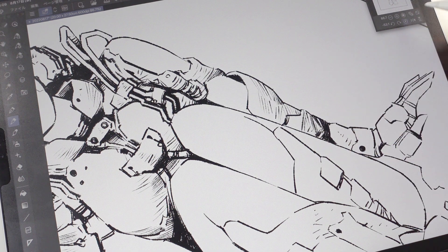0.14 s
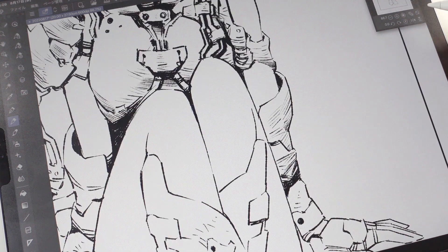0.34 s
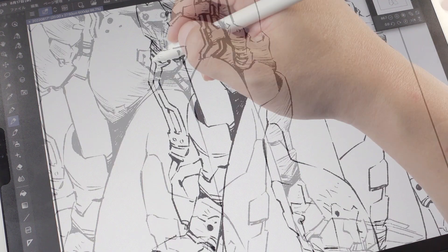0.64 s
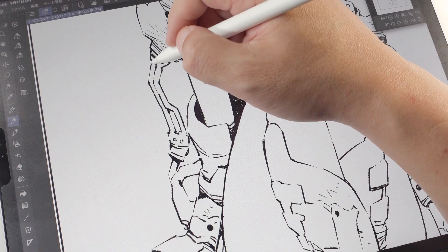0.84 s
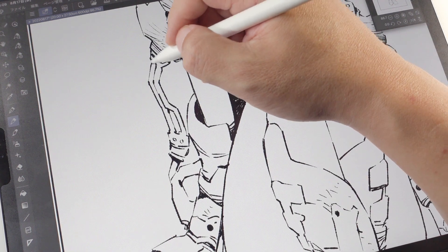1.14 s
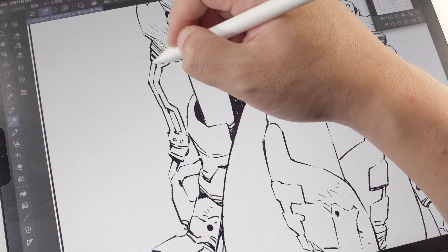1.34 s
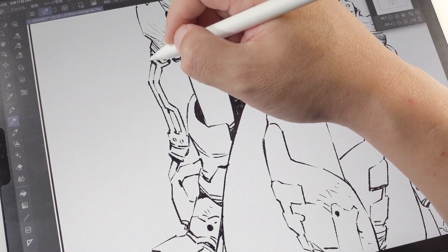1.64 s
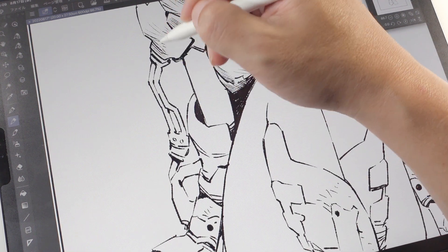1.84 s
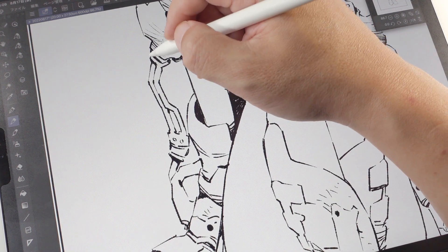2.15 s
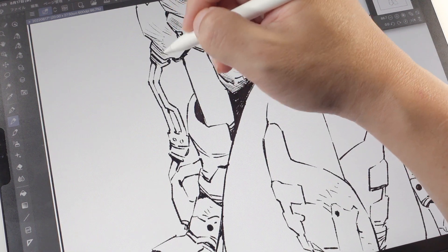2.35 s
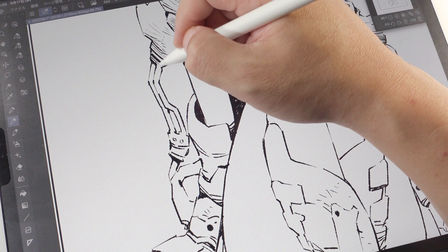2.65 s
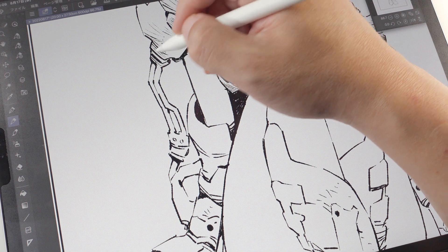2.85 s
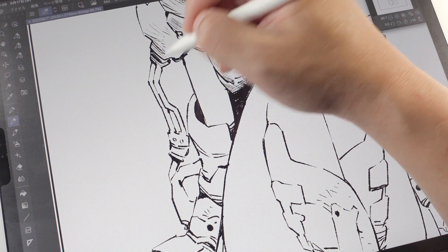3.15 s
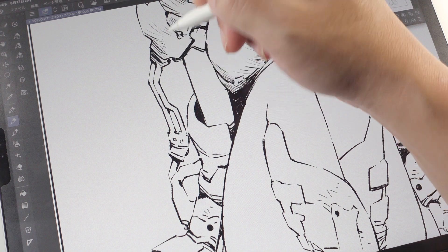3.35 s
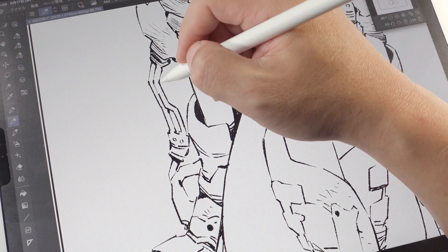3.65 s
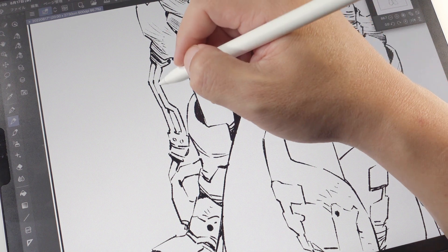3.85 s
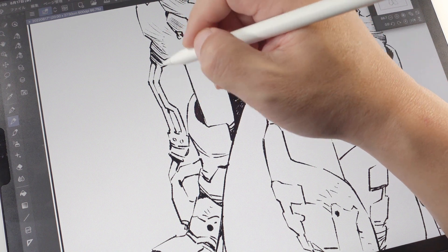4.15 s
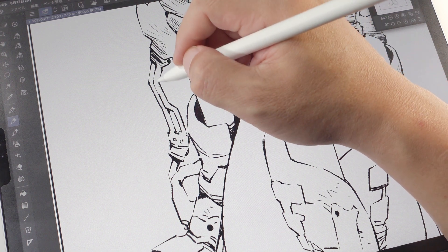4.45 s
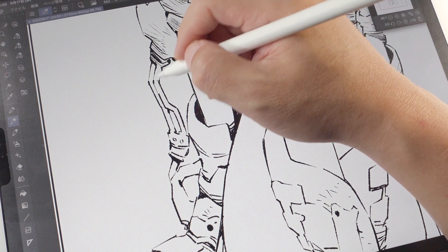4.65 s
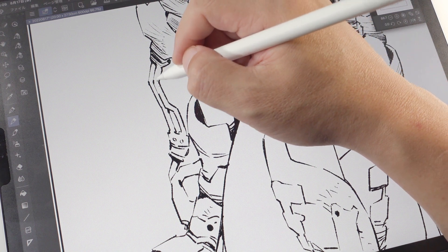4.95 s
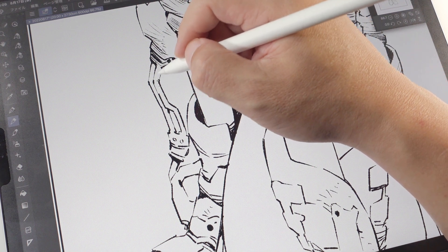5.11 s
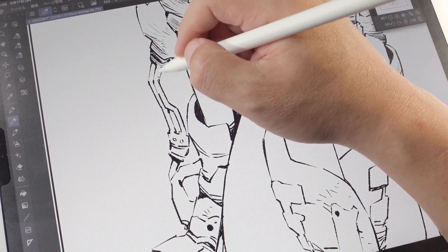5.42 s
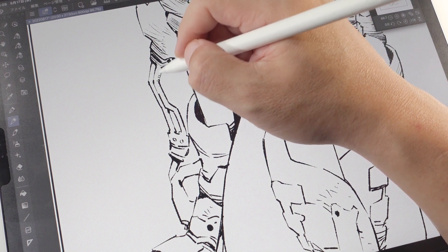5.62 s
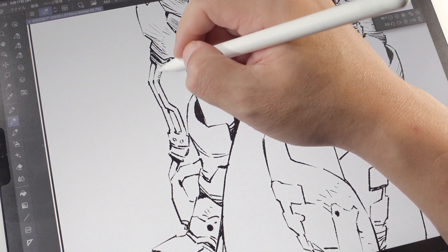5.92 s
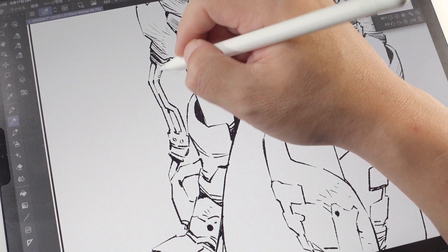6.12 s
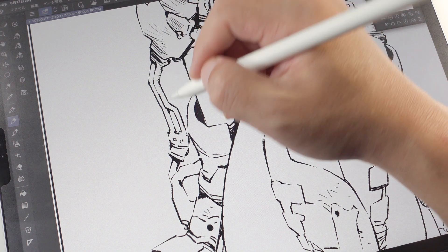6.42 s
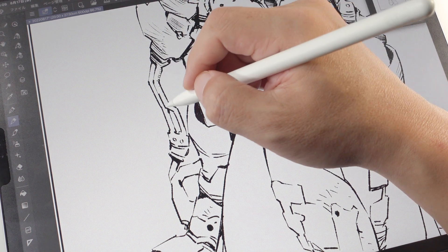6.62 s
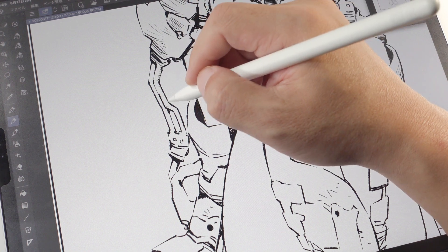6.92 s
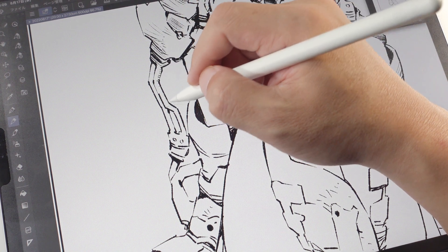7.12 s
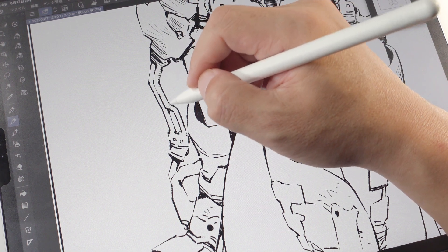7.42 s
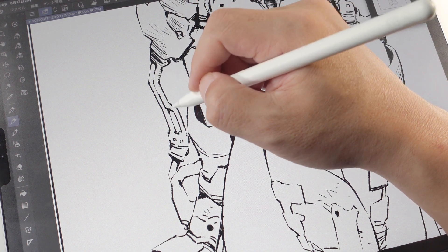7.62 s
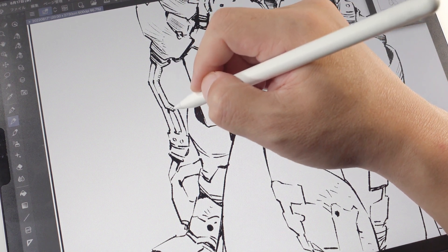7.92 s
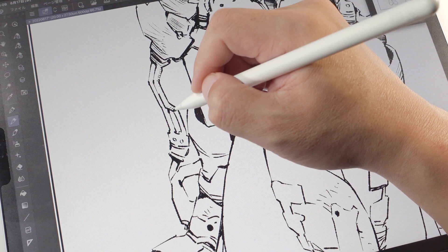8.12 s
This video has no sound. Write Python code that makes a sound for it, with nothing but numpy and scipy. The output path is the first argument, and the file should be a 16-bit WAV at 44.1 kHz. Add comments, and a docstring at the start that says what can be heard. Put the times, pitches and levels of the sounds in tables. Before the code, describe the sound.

A hard stylus tip taps a glass drawing tablet on a desk, each tap a tight click with a dull case knock and low desk thump. Quick scratchy strokes cluster early, then sharper hissing ones, then spaced taps with tiny scrapes. A palm lands softly twice. Small indoor room, low hum and faint hiss, close stereo microphones.

```python
"""Desk tremor, a low room hum and microphone hiss run throughout, made of shaped noise.
At once a plastic stylus begins to tap a glass tablet, on a desk that also holds a camera close by.
Each tap is a set of fading tones: a click in the glass, a knock in the case and a sway of the desk.
Strokes follow the taps as friction noise; at times skin swishes over the glass, also as noise.
From the middle on, the palm lands softly now and then: a slow rocking of the desk and a dull rub."""
import sys
import numpy as np
from scipy import signal
from scipy.fft import rfft, irfft, next_fast_len
from scipy.io import wavfile
from scipy.ndimage import map_coordinates

SR = 44100
rng = np.random.default_rng(int(sys.argv[2]) if len(sys.argv) > 2 else 0)


def materialize(psi):
    """Save the field psi as 16-bit PCM at rate SR to the path in sys.argv[1].

    A 1-D psi becomes a single channel; in a 2-D psi each row is a channel.
    """
    bounded = np.clip(np.atleast_2d(psi).T, -1, 1)
    quanta = np.round(bounded * 32767).astype(np.int16)
    wavfile.write(sys.argv[1], SR, quanta)


N = 364707  # length in samples


def amp(db):
    """Turn a level in dB into a factor for the sound wave."""
    return 10 ** (np.asarray(db) / 20)


def unit(x):
    """Scale x to an average strength (rms) of 1."""
    return x / np.sqrt(np.mean(x ** 2) + 1e-20)


def along(points, hz):
    """Read a value between (Hz, value) points, with pitch on a log axis."""
    point_hz, values = np.transpose(points)
    return np.interp(np.log(hz + 1), np.log(point_hz + 1), values)


def curves(rows):
    """Give one value per sample for each column after the time."""
    seconds, *columns = np.transpose(rows)
    return [np.interp(np.arange(N) / SR, seconds, column) for column in columns]


def wobble(rate):
    """Draw a smooth random curve through rate random points a second."""
    knots = rng.standard_normal(int(N * rate / SR) + 4)
    return map_coordinates(knots, [np.arange(N) * rate / SR])


def filtered(x, response):
    """Multiply each frequency of x by the response at that frequency."""
    m = next_fast_len(N + SR // 2)
    spectrum = rfft(x, m) * response(np.fft.rfftfreq(m, 1 / SR))
    return irfft(spectrum, m)[..., :N]


def shape(points):
    """Make a gain for each frequency from (Hz, dB) points."""
    return lambda hz: amp(along(points, hz))


def noise(gain, alike):
    """Make stereo noise of rms 1: sharing the middle and side parts sets how alike left and right are."""
    def turn(hz):
        return np.arccos(np.clip(along(alike, hz), -1, 1)) / 2

    def middle_and_side(hz):
        return gain(hz) * [np.cos(turn(hz)), np.sin(turn(hz))]

    mid, side = filtered(rng.standard_normal((2, N)), middle_and_side)
    return unit(np.array([mid + side, mid - side]))


def swept(x, centre_hz, width_hz, skirt):
    """Pass x through a moving resonance at unchanged power; skirt is the gain left far from its peak."""
    hz, t, z = signal.stft(x, SR, nperseg=256)
    at = np.minimum((t * SR).astype(int), N - 1)
    peak = skirt + np.exp(-((hz[:, None] - centre_hz[at]) / (width_hz[at] + 1)) ** 2)
    power = np.mean(abs(z) ** 2, axis=(0, 2))
    peak = peak / np.sqrt(power @ peak ** 2 / power.sum())
    return signal.istft(z * peak, SR, nperseg=256)[1][:, :N]


def swells(start, held, rise, fall):
    """Make one row of gains per movement: a rise in dB per s up to start, a hold in s, a fall in dB per s."""
    t = np.arange(N // 44 + 2) * 44 / SR - np.reshape(start, (-1, 1))  # steps of about 1 ms
    rising = np.reshape(rise, (-1, 1)) * np.minimum(t, 0)
    falling = fall * np.maximum(t - np.abs(np.reshape(held, (-1, 1))), 0)
    return amp(rising - falling)


def summed(db, gains):
    """Add the power of all movements at their levels and give one gain per sample."""
    total = np.sqrt(amp(db) ** 2 @ gains ** 2)
    return np.interp(np.arange(N) / 44, np.arange(gains.shape[1]), total)


def leading(values, db, gains):
    """Average the movements' values by power, so the loudest movement leads."""
    weight = (amp(db)[:, None] * gains) ** 2 + 1e-30
    mean = values @ weight / weight.sum(axis=0)
    return np.interp(np.arange(N) / 44, np.arange(gains.shape[1]), mean)


# The desk trembles under the arm. Each row: time in seconds, level in dB before a random wobble.
TREMOR_LEVEL = [(0.0, -35.5), (0.55, -38.5), (1.15, -23.5), (2.97, -33.5), (3.78, -21), (4.05, -30),
                (4.47, -26), (5.27, -35.5), (5.44, -32.5), (6.06, -22.5), (6.4, -32), (6.7, -15.5),
                (6.82, -29.5), (7.6, -29.5), (7.76, -24), (8.27, -22.5)]
# Tone colour of the tremor. Each row: frequency in Hz, relative level in dB per Hz.
TREMOR_COLOUR = [(2, 2), (8, 15), (15, 8.5), (25, 14), (35, -15), (60, -8), (120, -120)]


def desk_tremor():
    """The desk trembles: very low noise whose level wanders."""
    level = amp(curves(TREMOR_LEVEL)[0] + 3.0 * wobble(6))
    return level * noise(shape(TREMOR_COLOUR), [(25, 0.077)])


# The steady background. Each row: time in seconds, hum level in dB before a wobble, hiss level in dB.
BACKGROUND_LEVEL = [(0, -43, -64), (.45, -49.5, -67), (.92, -41.5, -61.5), (4.4, -41.5, -62),
                    (8.27, -40.5, -61)]
# Tone colours of the hum and the hiss. Each row: frequency in Hz, relative level in dB per Hz.
HUM_COLOUR = [(24, -13), (40, -9), (75, -10.5), (205, -16.5), (281, -21), (363, -33.5), (772, -42.5),
              (969, -56.5), (1200, -50), (1560, -103), (2640, -120)]
HISS_COLOUR = [(530, -46), (900, -2), (1030, -9), (1370, -3), (1580, -7), (2900, -3), (4610, -2.5),
               (9200, -7.5), (12400, -8), (15600, -11.5)]
# How alike the two sides are. Each row: frequency in Hz, likeness (1 is the same, 0 is unrelated).
BACKGROUND_ALIKE = [(60, 0.04), (180, 0.81), (550, 0.34), (1650, 0.32), (4970, 0.028), (15000, 0.051)]


def hum_and_hiss():
    """The room hums as slightly wavering low noise; the microphones hiss as steadier, brighter noise."""
    hum_db, hiss_db = curves(BACKGROUND_LEVEL)
    hum = amp(hum_db + 0.7 * wobble(8.3)) * noise(shape(HUM_COLOUR), BACKGROUND_ALIKE)
    hiss = amp(hiss_db) * noise(shape(HISS_COLOUR), BACKGROUND_ALIKE)
    return hum + hiss


def ring(modes, t, blow, attack, crest, spread=0):
    """A struck body rings in fading tones that crest together, low ones later by spread (s at 70 Hz)."""
    t = np.maximum(t, 0)
    # blow: (Hz, dB) points of how hard each tone is struck; each tone also varies a little by chance
    chance = rng.normal(0, [2.2, .015, .35], (len(modes), 3))
    tones = 0
    for (hz, db, t60), (more_db, detune, phase) in zip(modes, chance):
        fading = amp(db + along(blow, hz) + more_db - 60 * t / t60)
        since_crest = t - crest - spread * np.sqrt(70 / hz)
        tones = tones + fading * np.cos(2 * np.pi * hz * (1 + detune) * since_crest + phase)
    return tones * (1 - np.exp(-t / attack)) ** 3


# The taps. Each row: time in seconds, then relative levels in dB: click low, click high, click snap,
# knock low, knock middle, knock high, desk sway.
TAP_LIST = [(0.0094, -24, -24.5, -40.5, -22, -28, -41, -7.5), (0.7828, -27.5, -47, -62, -23, -20, -47, -12),
            (1.1295, -25.5, -44, -59, -23.5, -26, -47, -19), (2.1674, -38, -66, -63, -32, -29, -74, -19),
            (2.655, -15.5, -31, -39.5, -13, -21, -34.5, 0.5),
            (3.022, -53, -61, -69, -38.5, -36.5, -83, -18), (4.007, -30, -49, -61, -22.5, -26, -35.5, -9),
            (4.5453, -34.5, -72, -67, -35.5, -32.5, -45.5, -16.5),
            (4.923, -45, -79, -71, -40.5, -43.5, -57.5, -18.5),
            (5.2575, -30, -70, -58, -24, -24.5, -41, -10), (5.5152, -28, -63, -61, -20, -25.5, -39, -7.5),
            (5.7347, -27.5, -51, -58, -22.5, -24, -42.5, -8),
            (5.929, -22.5, -34.5, -54.5, -15.5, -22, -36.5, -7),
            (6.0951, -26, -37.5, -60, -16, -24, -36, -3), (6.8015, -38, -51, -70, -27, -32, -47, -20),
            (7.0324, -24.5, -24.5, -53, -19, -22.5, -35, -5), (7.2912, -27.5, -30, -80, -25, -24, -40, -15),
            (7.5616, -28.5, -27.5, -68, -27, -26, -39, -9.5),
            (7.8047, -24, -21, -47, -15.5, -19, -32, -3.5), (8.016, -23.5, -25, -57, -21, -19.5, -36, -5),
            (8.2273, -30.5, -30, -68, -19, -25, -39, -9.5)]
# Tones of the glass, the case and the desk, before chance changes to level and pitch.
# Each row: frequency in Hz, relative level in dB, time to fade by 60 dB in seconds.
GLASS_TONES = [(2084, -13, 0.02), (2256, 5, 0.01), (2750, 1.5, 0.0081), (3054, -5.5, 0.011),
               (3280, -13, 0.01), (3720, -4.5, 0.019), (3900, -24, 0.005), (4550, 7.5, 0.0075),
               (5300, 4, 0.0049), (7800, 21.5, 0.0022), (10600, 4.5, 0.0053)]
CASE_TONES = [(68.6, 3.5, 0.05), (115, -6.5, 0.09), (156.2, -3.5, 0.071), (189.6, -1.5, 0.0559),
              (256.5, -9.5, 0.057), (349, -1, 0.036), (448.7, 0, 0.05), (527, -1.5, 0.028),
              (620, -21, 0.043), (872, 3, 0.016), (1055, -4, 0.014), (1396, -10.5, 0.016)]
DESK_TONES = [(24.7, -8.5, 0.32), (13.6, -25, 0.88)]


def taps():
    """The glass clicks through the air; knock and sway follow through desk and stand."""
    click, knock = np.zeros(N + SR), np.zeros(N + SR)
    t = np.arange(SR // 2) / SR - 1 / 500  # s, from 2 ms before the tap
    for s, tock_db, tick_db, snap_db, low_db, mid_db, high_db, sway_db in TAP_LIST:
        first = round((s + t[0]) * SR)
        at = slice(first, first + len(t))
        glass_blow = [(2300, tock_db + 7.5), (2600, tick_db + 18.5),
                      (3300, tick_db + 4.0), (3550, snap_db + 11.5)]
        click[at][:2000] -= ring(GLASS_TONES, t[:2000] + 0.000427, glass_blow,
                                 attack=0.00084, crest=0.001497)
        # the panel dents for an instant
        knock[at] -= amp(low_db + 5.0) * np.exp(-((t - .0011) / 0.00065) ** 2)
        case_blow = [(270, low_db + 12.5), (340, mid_db + 7.5), (660, mid_db + 6), (800, high_db + 21.5)]
        knock[at] -= ring(CASE_TONES, t - .0005, case_blow, attack=0.0025, crest=0.002315, spread=0.0019)
        knock[at] += ring(DESK_TONES, t - .004, [(25, sway_db + 6.5)], attack=0.0082, crest=0.013)
    return click[:N], knock[:N]


SKID_DELAY = 0.0087  # s from a tap to its skid and shudder

# Tone colour of the shuddering case. Each row: frequency in Hz, relative level in dB per Hz.
SHUDDER_COLOUR = [(60, -120), (110, -0.5), (300, -4), (600, -12), (900, -19), (1150, -28), (2000, -120)]


def case_shudder():
    """The case shudders on after a tap: noise 15.5 dB under the middle knock level, falling 236 dB per s."""
    tap_s, mid_db = np.transpose(TAP_LIST)[[0, 5]]
    gain = summed(mid_db - 15.5, swells(tap_s + SKID_DELAY, 0, 4000, 236))
    return gain * noise(shape(SHUDDER_COLOUR), [(400, 0.93)])


RUB_ALIKE = [(1000, 0.98), (10000, 0.47)]  # left-right likeness of all rubbing: (Hz, likeness)

# The strokes. Each row: start of full speed in seconds, hold in seconds, rise in dB per s,
# scrape level in dB, scrape centre in Hz, scrape width in Hz, rasp level in dB, squeak level in dB,
# tip hiss level in dB, tip hiss centre in Hz. The levels are relative.
STROKE_LIST = [(0.027, 0.015, 893, -50.5, 3480, 800, -66, -80, -84, 8000),
               (0.908, 0.017, 800, -55, 1950, 500, -57.5, -81, -69, 8600),
               (1.195, 0.021, 800, -46.5, 2230, 700, -70, -70, -64, 8650),
               (1.262, 0.047, 1800, -45, 2430, 700, -52.5, -74, -56, 8150),
               (1.365, 0.018, 900, -47.5, 2600, 600, -64, -73, -58, 9190),
               (1.451, 0.036, 1800, -51, 2640, 380, -53.5, -82, -70, 8240),
               (1.547, 0.024, 1000, -52, 2600, 300, -58, -68, -59, 8300),
               (1.618, 0.038, 1400, -53, 2700, 350, -58, -71, -63.5, 8190),
               (1.712, 0.024, 1000, -50.5, 2880, 500, -70, -70, -59, 7300),
               (2.227, 0.036, 1200, -47.5, 2360, 594, -86, -54, -38.5, 7860),
               (2.7, 0.015, 550, -44.5, 2430, 600, -53.5, -42.5, -42.5, 9500),
               (3.09, 0.025, 1000, -40.5, 2600, 644, -67, -47, -31.5, 8340),
               (3.236, 0.0036, 1500, -76, 2700, 600, -75, -66, -68, 9400),
               (4.055, .006, 500, -52, 2360, 500, -50, -80, -67, 8530),
               (4.6, .006, 500, -63, 2170, 500, -73, -80, -75, 8000),
               (5.312, .006, 500, -63, 2120, 500, -67, -82, -73, 7800),
               (5.555, 0.019, 500, -67, 2260, 500, -67, -82, -80, 8600),
               (5.78, .01, 500, -65, 2320, 500, -68, -82, -77, 8200),
               (5.98, .006, 400, -64, 2440, 500, -67, -82, -74, 8600),
               (6.148, .006, 500, -57.5, 2360, 500, -59.5, -89, -76, 8000),
               (6.874, .006, 500, -61, 2620, 348, -66, -82, -75, 8260),
               (7.078, 0.011, 400, -58.5, 2530, 600, -69, -74, -74, 8500),
               (7.364, 0.014, 400, -53.5, 2570, 300, -63, -78, -74, 8750),
               (7.625, 0.016, 300, -58, 2620, 352, -62, -84, -76, 9100),
               (7.862, 0.014, 349, -52, 2680, 300, -62, -84, -69, 8560),
               (8.075, 0.021, 350, -52, 2680, 300, -65, -74, -73, 8700)]


def strokes():
    """The rubbing tip makes friction noise in glass and case; it also skids briefly after each tap."""
    (s, held, rise, scrape_db, scrape_hz, width_hz,
     rasp_db, squeak_db, tip_db, tip_hz) = np.transpose(STROKE_LIST)
    # a faint drag, falling at only 160 dB per s, outlasts the stroke
    speed = swells(s, held, rise, 790) + amp(-17.5) * swells(s, held, rise, 160)
    skid = swells(np.transpose(TAP_LIST)[0] + SKID_DELAY, 0, 4000, 520)
    grit = unit(amp(1.5 * wobble(180)))  # the tip catches unevenly
    rubbing = (scrape(speed, skid, scrape_db, scrape_hz, width_hz) + rasp(speed, skid, rasp_db)
               + squeak(speed, squeak_db) + tip_hiss(speed, tip_db, tip_hz))
    return grit * rubbing


# Tone colour of rubbed glass. Each row: frequency in Hz, relative level in dB per Hz.
SCRAPE_COLOUR = [(1400, -120), (1650, -16.5), (1850, 0.5), (2050, 2), (2250, 2), (2430, -5), (2680, 2.5),
                 (3000, -2.5), (3400, -14), (3800, -11), (4500, -5), (5000, -120)]
# Two scrapes of a skid, following the low and the high click.
# Each row: centre in Hz, level in dB relative to that click.
SKID_SCRAPES = [(2250, -27), (2950, -24.5)]


def scrape(speed, skid, scrape_db, centre_hz, width_hz):
    """Friction sounds the glass: noise through a resonance that moves with strokes and skids."""
    tock_db, tick_db = np.transpose(TAP_LIST)[[1, 2]]
    (low_hz, low_db), (high_hz, high_db) = SKID_SCRAPES
    each = np.ones(len(TAP_LIST))
    rubs = np.r_[speed, skid, skid]
    level_db = np.r_[scrape_db, tock_db + low_db, tick_db + high_db]
    centre_hz = leading(np.r_[centre_hz, low_hz * each, high_hz * each], level_db, rubs)
    width_hz = leading(np.r_[width_hz, 840 * each, 840 * each], level_db, rubs)
    glass = noise(shape(SCRAPE_COLOUR), RUB_ALIKE)
    return summed(level_db, rubs) * swept(glass, centre_hz, width_hz, skirt=0.08)


# The rasp moves with the place on the screen. Each row: time in seconds, centre in Hz, width in Hz.
RASP_PLACE = [(0, 1720, 280), (2.3, 1800, 279), (2.6, 1450, 400), (6.2, 1350, 300), (6.7, 1360, 180)]


def rasp(speed, skid, rasp_db):
    """Friction excites the case's top modes; after taps the rasp follows the high knock, 20 dB lower."""
    def top_modes(hz):
        return 1 / (1 + ((hz - 1360) / 70) ** 2) + 0.54 / (1 + ((hz - 1740) / 170) ** 4)

    high_db = np.transpose(TAP_LIST)[6]
    gain = summed(np.r_[rasp_db, high_db - 20], np.r_[speed, skid])
    return gain * swept(noise(top_modes, RUB_ALIKE), *curves(RASP_PLACE), skirt=.1)


def squeak(speed, squeak_db):
    """Strokes squeak: noise in one narrow resonance near 5230 Hz."""
    return summed(squeak_db, speed) * noise(lambda hz: 1 / (1 + ((hz - 5230) / 160) ** 2), RUB_ALIKE)


# Resonances of the stylus tip. Each row: centre in Hz, width in Hz, relative level in dB.
TIP_TONES = [(6370, 120, -0.5), (6820, 260, -4), (8240, 300, -9.5), (9150, 140, -15), (9490, 400, -1.5),
             (10640, 310, -8), (11400, 230, -8.5), (12700, 300, -12)]
# Tone colour of fast strokes. Each row: frequency in Hz, relative level in dB per Hz.
FAST_COLOUR = [(3100, -40), (3550, -27), (4000, -37.5), (5800, -33.5), (6070, -42), (6300, -23.5),
               (6560, -17.5), (8410, -19), (10700, -12.5), (12900, -15), (14900, -29), (15600, -54)]


def tip_hiss(speed, tip_db, tip_hz):
    """Light strokes only ring the tip's resonances; hard ones hiss broadly."""
    def resonances(hz):
        return sum(amp(db) / (1 + ((hz - centre) / width) ** 2) ** 2 for centre, width, db in TIP_TONES)

    gain = summed(tip_db, speed ** 0.98) * unit(amp(2.5 * wobble(70)))
    hard = 1 / (1 + amp(-47 - leading(tip_db, tip_db, speed)) ** 2)  # share of broad hiss, half at -47 dB
    ringing = np.sqrt(1 - hard) * noise(resonances, RUB_ALIKE)
    broad = np.sqrt(hard) * noise(shape(FAST_COLOUR), RUB_ALIKE)
    centre_hz, width_hz = leading(tip_hz, tip_db, speed), np.full(N, 1040)
    return gain * swept(ringing + broad, centre_hz, width_hz, skirt=0.59)


# How the room's answer dies away. Each row: frequency in Hz, time to fade by 60 dB in seconds.
ROOM_FADE = [(200, 0.23), (2000, 0.18), (10000, 0.02)]


def room(x):
    """The room answers with fading noise; four different answers take turns."""
    hz, t, z = signal.stft(rng.standard_normal((4, 2, SR // 2)), SR, nperseg=256)
    fading = amp(-60 * t / along(ROOM_FADE, hz)[:, None])
    tails = signal.istft(z * fading, SR, nperseg=256)[1]
    tails = tails / np.linalg.norm(tails[0, 0])
    turns = (np.arange(N) // (SR // 5) % 4 == np.arange(4)[:, None]) * x  # a new answer every 0.2 s
    late = np.pad(turns, ((0, 0), (300, 0)))  # the answer waits 300 samples
    return signal.fftconvolve(late[:, None], tails, axes=2).sum(axis=0)[:, :N]


# Skin slides on the glass. Each row: time of the peak in seconds, relative level in dB.
SWISH_LIST = [(0.664, -59), (4.146, -60), (6.348, -40.5)]
# Tone colour of sliding skin. Each row: frequency in Hz, relative level in dB per Hz.
SKIN_COLOUR = [(4350, -55), (7400, -23), (7780, -5), (8250, 1.5), (9260, -10.5), (9820, -1), (10400, -16),
               (10700, -1.5), (11300, 4), (11800, -21), (12900, 0), (14300, -8), (15600, -21)]


def skin_swish():
    """Skin slides over the glass: bright noise swelling at 900 and fading at 330 dB per s."""
    s, db = np.transpose(SWISH_LIST)
    return summed(db, swells(s, 0, 900, 330)) * noise(shape(SKIN_COLOUR), [(9000, 0.25)])


# The palm drags. Each row: start of full level in seconds, hold in seconds, level in dB before a wobble.
DRAG_LIST = [(3.575, 0.088, -51), (3.8, 0.011, -55), (6.525, 0.056, -47), (6.712, 0.082, -57)]
# Tone colour of the dragging palm. Each row: frequency in Hz, relative level in dB per Hz.
DRAG_COLOUR = [(80, -120), (200, 3), (350, 0), (550, -4), (760, -0.5), (900, -17.5), (1500, -27),
               (3000, -48), (5000, -120)]


def palm_drag():
    """The palm drags with a dull, uneven rub of low noise."""
    s, held, db = np.transpose(DRAG_LIST)
    gain = summed(db, swells(s, held, 520, 400)) * amp(3.1 * wobble(90))
    return gain * noise(shape(DRAG_COLOUR), [(500, 0.91)])


# The palm lands. Each row: time in seconds, relative sway level in dB, rise in seconds, frequency in Hz.
LANDING_LIST = [(3.621, -8, 0.037, 22.8), (3.81, -19, 0.11, 21.3), (6.53, -2.5, 0.041, 21.7),
                (6.711, -19, 0.011, 21)]


def palm_landing():
    """The landing palm rocks the desk: a slow tone that swells, then fades by 60 dB in 0.25 s."""
    rock = np.zeros(N)
    for s, db, rise, hz in LANDING_LIST:
        t = np.arange(N) / SR - s
        drop_db = np.where(t < 0, 9.6 * (t / rise) ** 2, 60 * t / 0.25)
        rock -= amp(db - drop_db) * np.cos(2 * np.pi * hz * t)
    return rock * amp([[-.7], [.7]])  # left and right, dB


def scene():
    """Add everything that reaches the two microphones."""
    background = desk_tremor() + hum_and_hiss()
    click, knock = taps()
    rubbing = case_shudder() + strokes() + skin_swish()
    palm = palm_drag() + palm_landing()

    above_sway = filtered(knock, lambda hz: hz ** 2 / (hz ** 2 + 90 ** 2))
    echo = room(amp(-18) * click + amp(-21.0) * rubbing.mean(axis=0) + amp(-17) * above_sway)

    # the screen lies off the microphones' axis, so the right one hears it later
    lag = .000034  # s

    def apart(hz):
        return np.exp(1j * np.pi * hz * lag * [[1], [-1]])

    screen = filtered((click + rubbing) * amp([[-.6], [.6]]), apart)
    return screen + knock * amp([[.3], [-.3]]) + palm + echo + background


def record(dry):
    """The camera rounds off the hardest blows and keeps nothing above its band limit."""
    soft = dry / (1 + abs(dry / .88) ** 4) ** .25
    return filtered(soft, lambda hz: hz < 15750)  # Hz


dry = scene()
out = record(dry)
materialize(out)
```